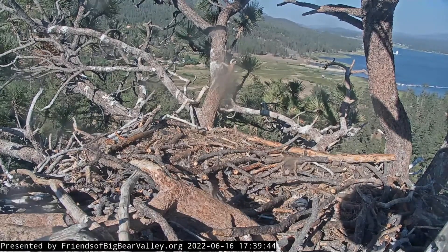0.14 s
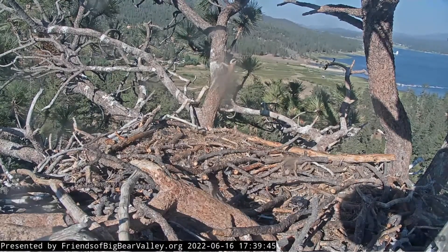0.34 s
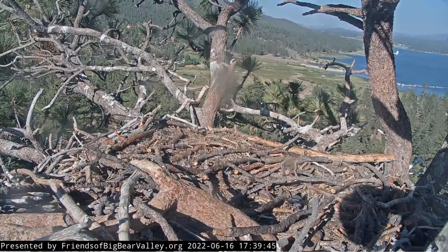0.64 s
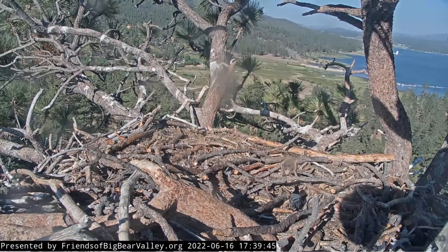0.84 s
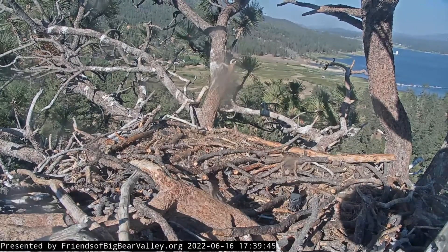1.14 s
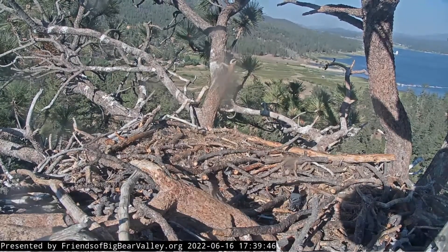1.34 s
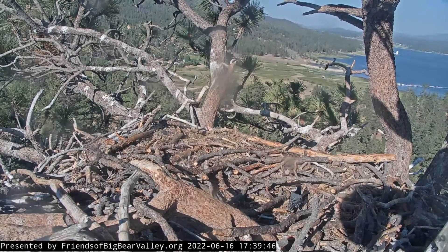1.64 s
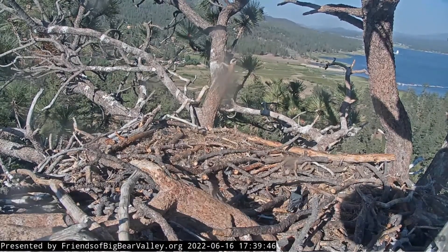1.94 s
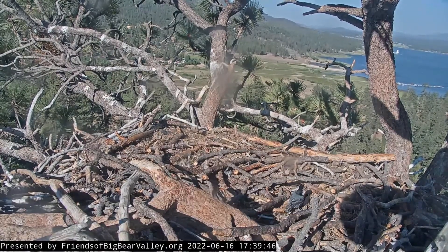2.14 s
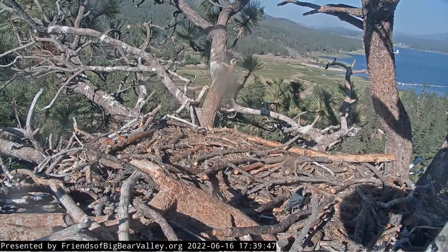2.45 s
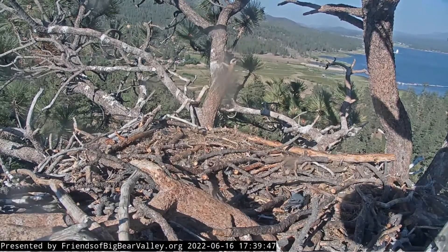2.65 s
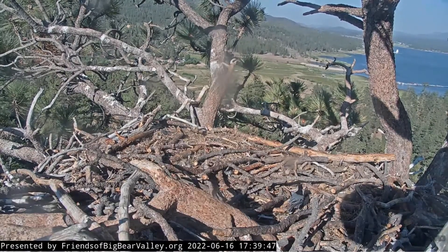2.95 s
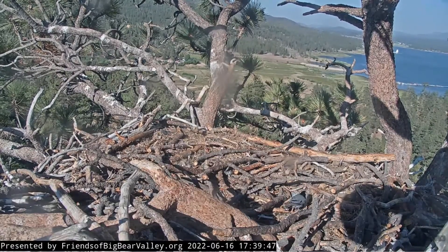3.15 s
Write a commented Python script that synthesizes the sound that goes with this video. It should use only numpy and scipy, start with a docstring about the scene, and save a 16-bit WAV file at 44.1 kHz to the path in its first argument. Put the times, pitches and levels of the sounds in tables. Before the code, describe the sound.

A small bird sings high, slurred whistles throughout, some way off with a soft forest echo, adding one buzzy trill from about 0.9 to 1.3 seconds. Low wind rumble and a wavering hum lie underneath, swelling from 2 seconds into a gust that peaks near 2.5. Twigs snap lightly around 2, 2.5 and 3 seconds. The microphone hisses faintly and ticks at a mostly even pace.

```python
"""A small bird, high in a pine above a lake and some way off, sings slurred whistles and one buzzy trill.
The whistles are gliding tones, the trill is a run of quick downward sweeps, and the trees echo both.
A low rumble with a wavering hum swells in a gust, and wind rises in the needles. Twigs snap lightly;
the microphone's electronics hiss and tick at a mostly even pace."""
import sys
import numpy as np
from scipy import signal
from scipy.fft import rfft, irfft
from scipy.io import wavfile
from scipy.ndimage import uniform_filter1d

SR = 44100
rng = np.random.default_rng(int(sys.argv[2]) if len(sys.argv) > 2 else 0)


def generate_wav(signal):
    """Clip the signal to [-1, 1] and save it as 16-bit WAV at the path in sys.argv[1]."""
    frames = np.transpose(np.atleast_2d(signal))
    scaled = np.clip(frames, -1, 1) * 32767
    pcm = np.round(scaled).astype(np.int16)
    wavfile.write(sys.argv[1], SR, pcm)


N = 145530
TIME = np.arange(N) / SR

# The bird's whistles, one list per phrase: t/s, f/Hz, level/dB
WHISTLE_PHRASES = [
    [(0.0, 3880, -52), (.025, 4050, -58), (.058, 3950, -56), (.069, 3395, -41), (.088, 2720, -56)],
    [(.165, 3150, -60), (.185, 3480, -50), (.208, 3660, -60), (.229, 3415, -44), (.247, 2690, -51)],
    [(.436, 2520, -53), (.462, 3444, -49.5), (.49, 3505, -53), (.506, 3630, -54), (.516, 3950, -44),
     (.531, 3643, -61), (.546, 3530, -43), (.57, 3990, -48.5), (.618, 3965, -52), (.633, 3380, -43.5),
     (.652, 2460, -57)],
    [(.772, 3100, -59), (.8, 3860, -51.5), (.855, 3860, -57), (.9, 4070, -52)],
    [(.83, 5720, -63), (.88, 5490, -58.5), (.92, 5540, -63)],
    [(1.35, 3100, -53), (1.372, 3620, -51), (1.415, 3670, -62), (1.455, 3930, -53), (1.473, 3860, -55),
     (1.5, 2980, -53)],
    [(1.7, 3435, -58), (1.745, 3515, -53), (1.785, 3470, -53.5)],
    [(1.955, 3040, -53), (2.01, 3430, -56), (2.03, 3540, -47.5), (2.045, 3510, -57), (2.057, 3520, -46),
     (2.069, 3560, -51), (2.096, 3600, -41.5), (2.112, 3400, -45), (2.127, 2980, -55)],
    [(2.297, 3214, -55), (2.318, 3483, -53), (2.35, 3520, -43.5), (2.378, 3508, -41), (2.393, 3467, -50),
     (2.422, 3400, -49), (2.438, 2930, -53)],
    [(2.605, 3210, -48), (2.626, 3540, -46.5), (2.665, 3575, -43.5), (2.7, 3570, -47), (2.728, 3390, -46.5),
     (2.785, 3455, -51.5), (2.81, 3590, -48), (2.828, 3570, -52)],
    [(2.868, 4003, -51.5), (2.93, 4045, -55), (2.962, 4070, -49), (2.983, 4030, -47), (2.995, 3400, -46)],
]
# How loud the three parts of the wind and the hum are over time: t/s, level/dB
RUMBLE_LOUDNESS = [(0, -41), (1.7, -41.5), (2.1, -39.5), (2.75, -39), (3.3, -38)]
GUST_LOUDNESS = [(0, -65.5), (1.7, -67), (2.05, -42), (2.2, -42), (2.48, -30), (2.75, -38.5), (3.3, -42)]
NEEDLES_LOUDNESS = [(0, -53.5), (1.8, -53), (2.3, -51.5), (2.7, -50), (3.3, -50.5)]
HUM_LOUDNESS = [(0, -45), (.85, -42.5), (1.1, -49), (1.4, -41), (3.3, -46)]
# The colour of each noise, or how strong its lows and highs are: f/Hz, relative level/dB
RUMBLE_COLOUR = [(20, -51), (50, -23.5), (80, -7.5), (110, -2), (135, -2.5), (160, -2.5), (195, -6.5),
                 (245, -16.5), (300, -34), (500, -65)]
GUST_COLOUR = [(20, -22), (35, -39), (50, -6), (70, -4), (90, 10), (120, 11.5), (160, -2), (280, -57)]
NEEDLES_COLOUR = [(150, -47), (320, -8), (480, -3.5), (700, -1), (950, -2.5), (1400, -7), (2000, -12),
                  (4000, -21.5), (8000, -38)]
HISS_COLOUR = [(300, -5), (2000, -4), (3100, 5.5), (4300, 1), (6300, 1), (9500, 2.5), (13300, 2.5),
               (15000, 0.5), (15800, 4.5)]
# Electrical ticks: t/s, peak level/dB
TICK_EVENTS = [(.2822, -26.5), (.6926, -27.5), (1.102, -29.5), (1.373, -31), (1.512, -31), (1.9223, -27),
               (2.3324, -26.5), (2.7424, -29), (3.1524, -29.5)]
# How loud the trill is over time: t/s, level/dB
TRILL_LOUDNESS = [(.888, -50), (.91, -43.5), (1.03, -45), (1.18, -45), (1.33, -49.5)]
# Snapping twigs: t/s, peak level/dB, f/Hz, amount of bright crack (0 to 1)
TWIG_SNAPS = [(1.974, -30.5, 3180, 0.41), (2.549, -35.5, 2870, .05), (2.97, -35.5, 3970, 0.25)]


def from_db(db):
    """Turn decibels into a number to multiply a sound by."""
    return 10 ** (np.asarray(db) / 20)


def rms_one(x):
    """Scale a signal so that its average strength (rms) is 1."""
    return x / np.sqrt(np.mean(x ** 2) + 1e-20)


def in_time(rows):
    """Join a table's points with straight lines: one curve for each column after the time."""
    times, *columns = np.transpose(rows)
    return [np.interp(TIME, times, column) for column in columns]


def drift(rate_hz):
    """A smooth random wobble of strength 1 that changes about this often a second."""
    keep_slow = 1 / (1 + (np.fft.rfftfreq(N, 1 / SR) / rate_hz) ** 2)
    return rms_one(irfft(rfft(rng.standard_normal(N)) * keep_slow, N))


def noise(colour):
    """Noise of strength 1 with the given colour."""
    hz, db = np.transpose(colour)
    gain = from_db(np.interp(np.log(np.fft.rfftfreq(N, 1 / SR) + 1), np.log(hz), db))
    return rms_one(irfft(rfft(rng.standard_normal(N)) * gain, N))


def band(x, low_hz, high_hz):
    """Keep the part of a sound between two frequencies."""
    return signal.sosfilt(signal.butter(2, [low_hz, high_hz], "band", fs=SR, output="sos"), x + 1e-18)


def tone(hz):
    """A pure tone that follows a pitch curve."""
    return np.sin(2 * np.pi * np.cumsum(hz) / SR)


def add(out, start_s, sound):
    """Mix a short sound in at the given time."""
    i = int(start_s * SR)
    out[i:i + len(sound)] += sound[:N - i]


def whistles(glide_s=.0059, fade_s=.0077, fast_slur_hz_per_s=25000):
    """The bird's nearly pure tones slide up, hold and drop; faster slides sound more ragged."""
    out = np.zeros(N)
    waver, flutter_db = .00338 * drift(90), 1.14 * drift(41)
    rough, ragged_db = .035 * drift(250), 2.5 * (drift(125) - .5)
    for phrase in WHISTLE_PHRASES:
        hz, db = in_time(phrase)
        hz = uniform_filter1d(hz, int(glide_s * SR) + 1)  # round off the corners
        slur = np.minimum(np.abs(np.gradient(hz)) * SR / fast_slur_hz_per_s, 1)  # 0 held, 1 fast
        inside_s = np.minimum(TIME - phrase[0][0], phrase[-1][0] - TIME)  # negative outside the phrase
        fade = np.clip(1 + inside_s / fade_s, 0, 1)
        loudness = fade * from_db(db + flutter_db + slur * ragged_db)
        out += loudness * tone(hz * (1 + waver + slur * rough))
    return out


def forest_echo(song, branches_s=.07, trees_s=.7, delay_s=.004):
    """Nearby branches smear the song, and the trees beyond add a soft tail."""
    branches = from_db(5 - 60 * TIME / branches_s)  # each dies away by 60 dB in its own time
    trees = from_db(-60 * TIME / trees_s)
    echoes = rng.standard_normal(N) * (branches + trees) * (TIME > delay_s)
    return signal.fftconvolve(song, echoes / np.linalg.norm(echoes))[:N]


def wind():
    """Moving air rumbles, buffets deeply in the gust and rushes through the pine needles."""
    rumble = from_db(in_time(RUMBLE_LOUDNESS)[0]) * noise(RUMBLE_COLOUR)
    gust = from_db(in_time(GUST_LOUDNESS)[0]) * noise(GUST_COLOUR)
    needles = from_db(in_time(NEEDLES_LOUDNESS)[0]) * noise(NEEDLES_COLOUR)
    return rumble + gust + needles


def hum(pitch_hz=134.2, wander_hz=.6, waver_db=.8):
    """A low, wavering drone inside the rumble; it fades briefly and returns."""
    loudness = from_db(in_time(HUM_LOUDNESS)[0] + waver_db * drift(2.7))
    return loudness * rms_one(tone(pitch_hz + wander_hz * drift(7.6)))


def hiss(level_db=-47.5):
    """The microphone's electronics make a steady, bright noise."""
    return from_db(level_db) * noise(HISS_COLOUR)


def ticks(length_s=.0008):
    """The electronics tick: dry, bright bursts of noise about a millisecond long."""
    out, t = np.zeros(N), TIME[:SR // 20]
    swell = np.sin(np.pi * np.minimum(t / length_s, 1))
    for time_s, db in TICK_EVENTS:
        burst = band(rng.standard_normal(len(t)) * swell, low_hz=7400, high_hz=12500)
        add(out, time_s - length_s / 2, from_db(db) * burst / np.abs(burst).max())
    return out


def trill(count=21, start_s=.886, spacing_s=.0214, slowing_s=.000033):
    """The bird buzzes: rough, raspy downward sweeps, about 45 a second, slowing a little."""
    sweep_s, top_hz, bottom_hz, scatter_db = .023, 3930, 2680, 1
    out = np.zeros(N)
    rough = 1 + .019 * drift(350)
    rasp = from_db(-13) * rms_one(band(rng.standard_normal(N), low_hz=3700, high_hz=5300))
    hz = np.linspace(top_hz, bottom_hz, int(sweep_s * SR))
    for k in range(count):
        time_s = start_s + spacing_s * k + slowing_s * k * k - sweep_s / 2
        span = int(time_s * SR) + np.arange(len(hz))
        sweep = (tone(hz * rough[span]) + rasp[span]) * np.hanning(len(hz))
        add(out, time_s, sweep * from_db(scatter_db * rng.standard_normal()))
    return out * from_db(in_time(TRILL_LOUDNESS)[0])


def twig_snaps(rise_s=.0009, ring_s=.027, width_octaves=.38, crack_hz=6300):
    """A brief crackle rings in each twig, with a brighter crack on top."""
    out, t = np.zeros(N), TIME[:SR // 10]
    spread = 2 ** (width_octaves / 2)
    loudness = np.minimum(t / rise_s, 1) * from_db(-60 * t / ring_s)
    for time_s, db, hz, bright in TWIG_SNAPS:
        crackle = rng.standard_normal(len(t)) * loudness
        ring = band(crackle, hz / spread, hz * spread)
        crack = band(crackle, crack_hz / spread, crack_hz * spread)
        snap = ring + bright * crack
        add(out, time_s, from_db(db) * snap / np.abs(snap).max())
    return out


def scene():
    """Everything reaches one microphone, the same in both channels; only the bird echoes."""
    song, buzz = whistles(), trill()
    echo = forest_echo(from_db(-7) * song + from_db(-3) * buzz)
    mix = song + buzz + echo + twig_snaps() + wind() + hum() + ticks() + hiss()
    return np.array([mix, mix])


def record(dry, soften_hz=14000, cutoff_hz=15800):
    """The high treble is softened, and above that the very top is cut off steeply."""
    softened = signal.sosfilt(signal.butter(8, soften_hz, fs=SR, output="sos"), dry)
    return signal.sosfilt(signal.ellip(12, .1, 90, cutoff_hz, fs=SR, output="sos"), softened)


dry = scene()
out = record(dry)
generate_wav(out)
```